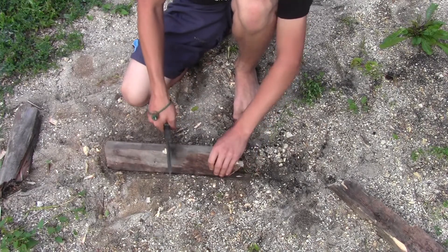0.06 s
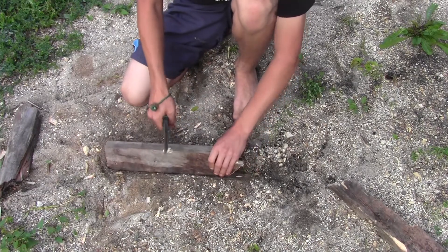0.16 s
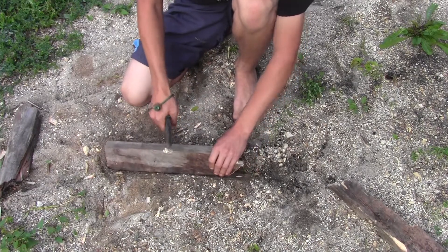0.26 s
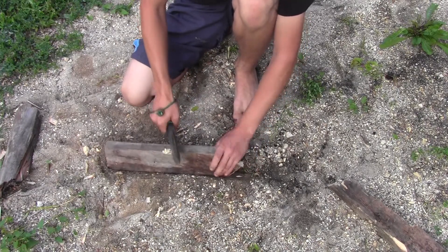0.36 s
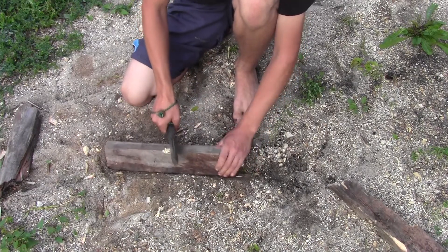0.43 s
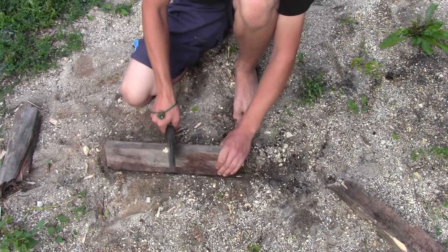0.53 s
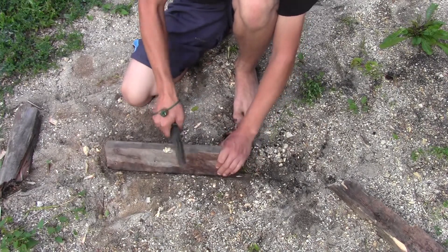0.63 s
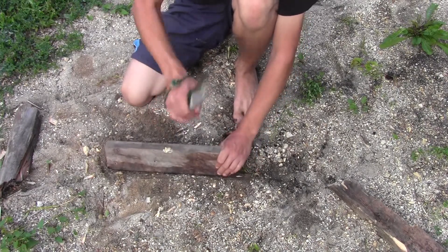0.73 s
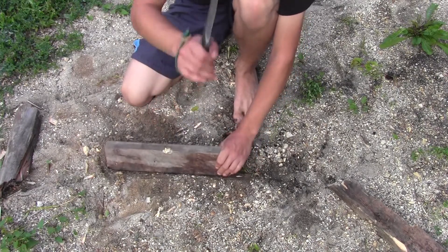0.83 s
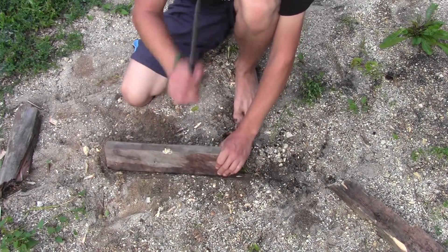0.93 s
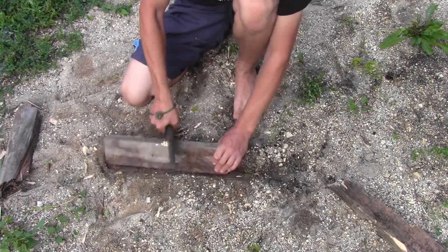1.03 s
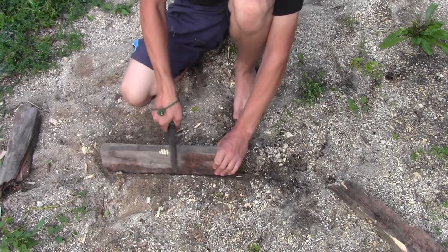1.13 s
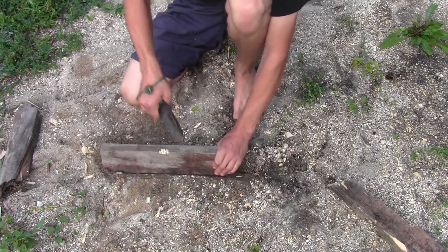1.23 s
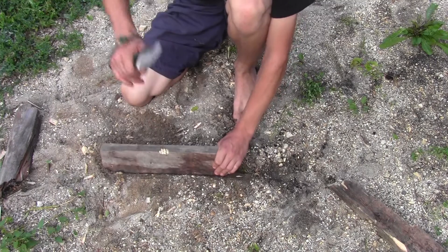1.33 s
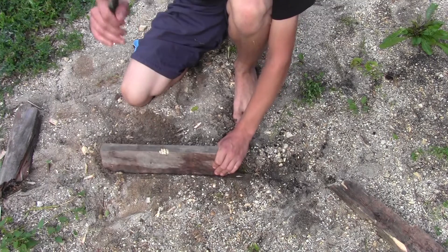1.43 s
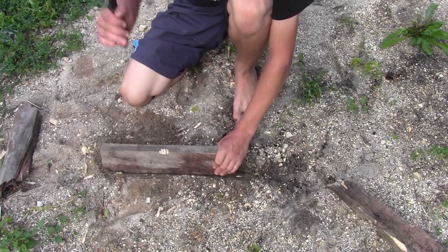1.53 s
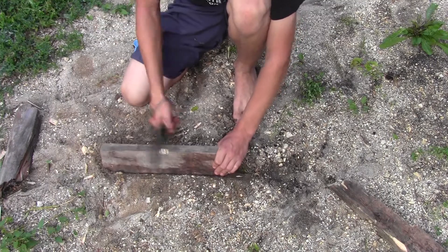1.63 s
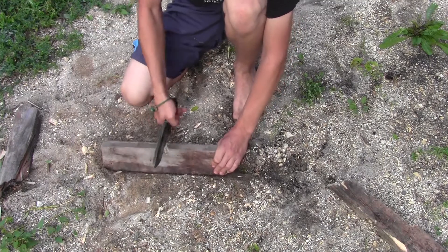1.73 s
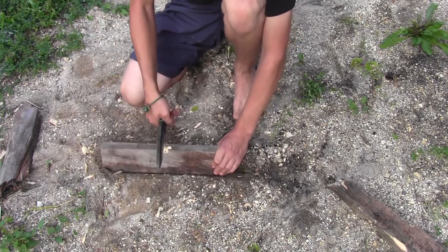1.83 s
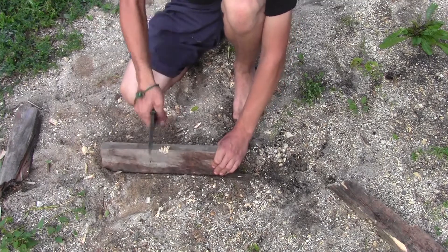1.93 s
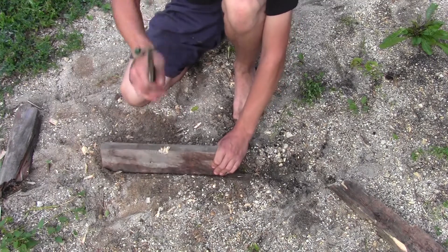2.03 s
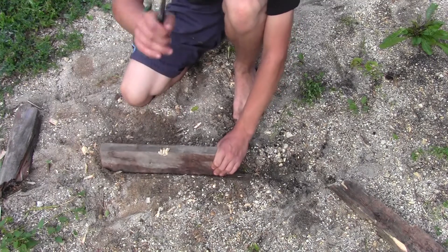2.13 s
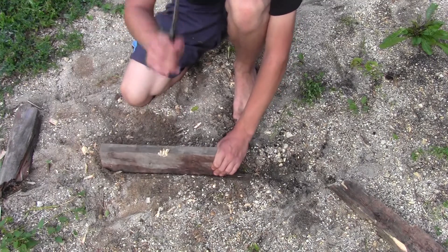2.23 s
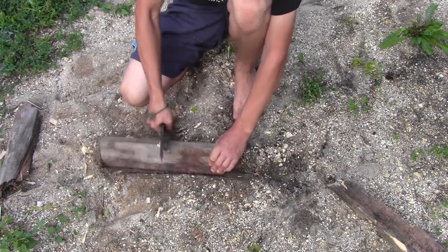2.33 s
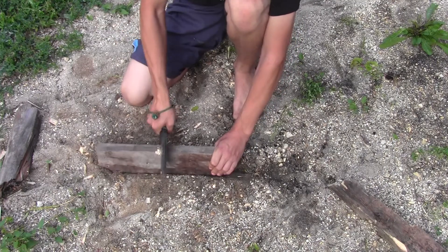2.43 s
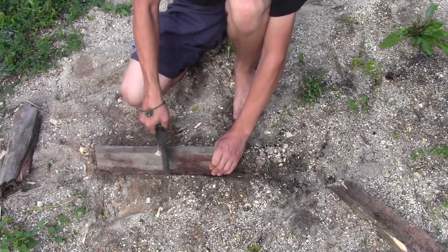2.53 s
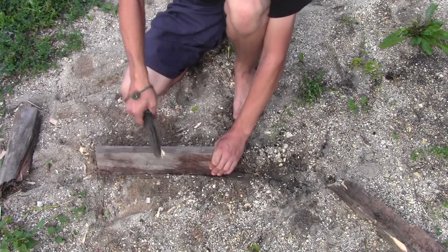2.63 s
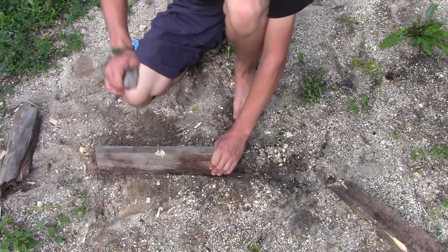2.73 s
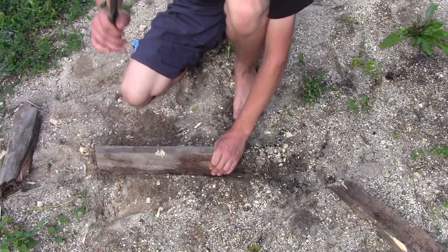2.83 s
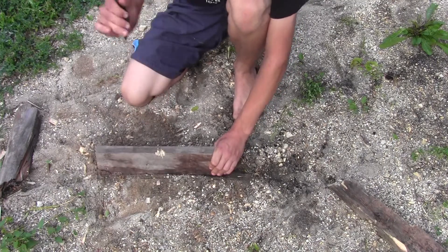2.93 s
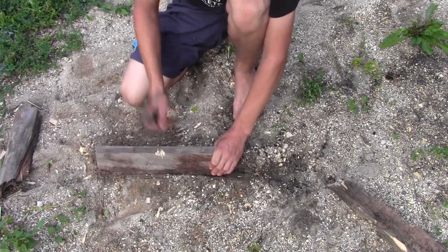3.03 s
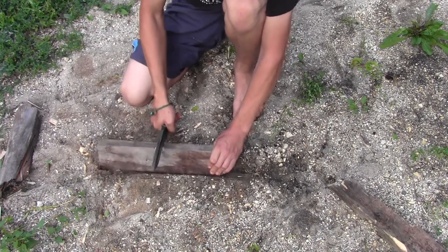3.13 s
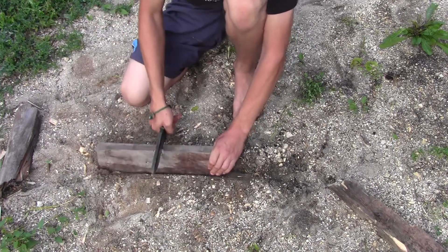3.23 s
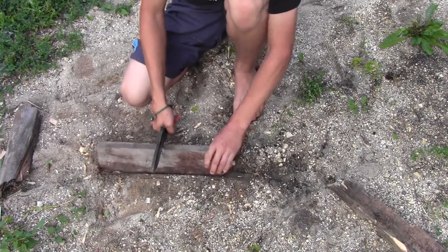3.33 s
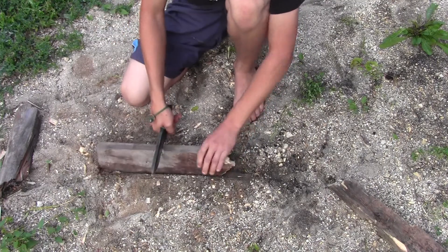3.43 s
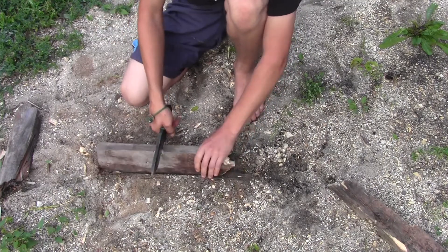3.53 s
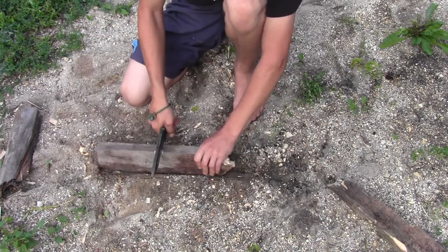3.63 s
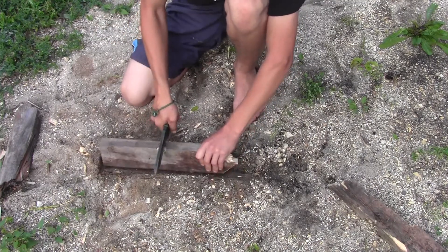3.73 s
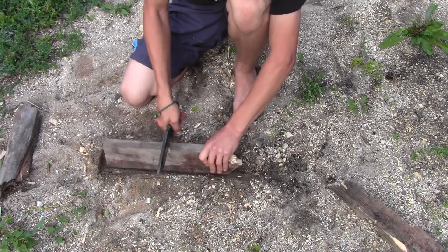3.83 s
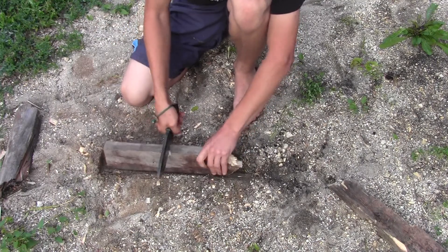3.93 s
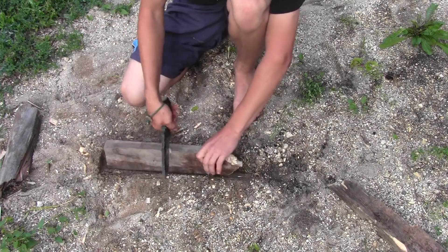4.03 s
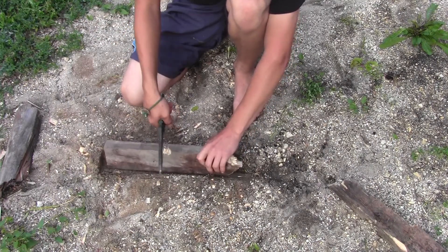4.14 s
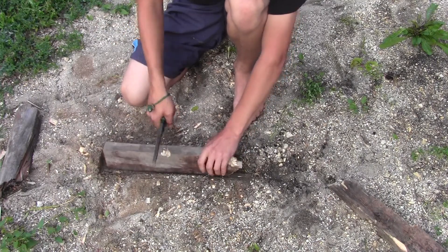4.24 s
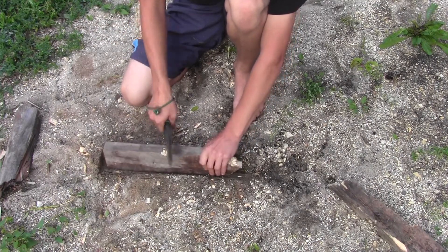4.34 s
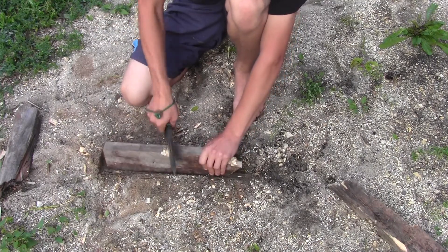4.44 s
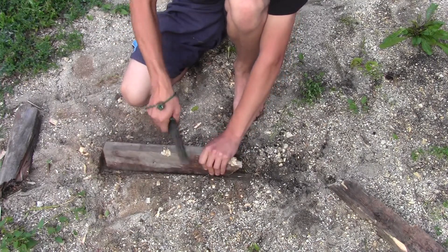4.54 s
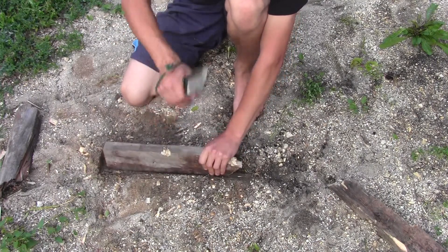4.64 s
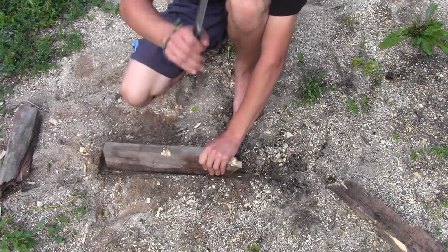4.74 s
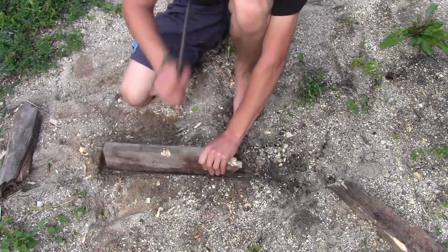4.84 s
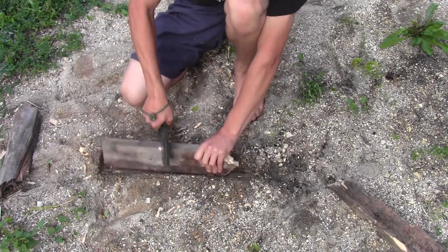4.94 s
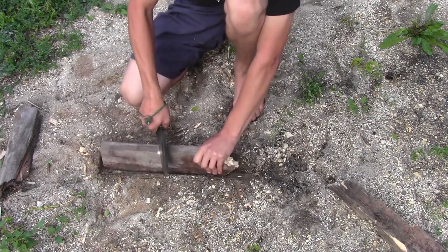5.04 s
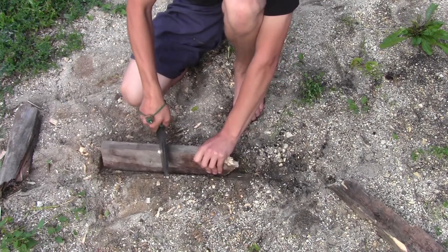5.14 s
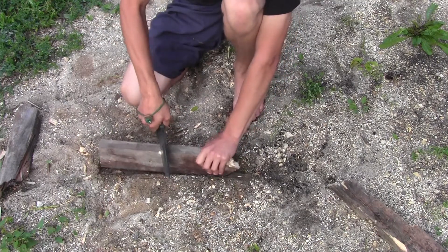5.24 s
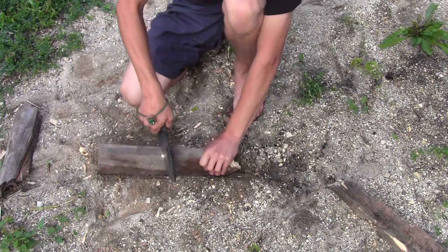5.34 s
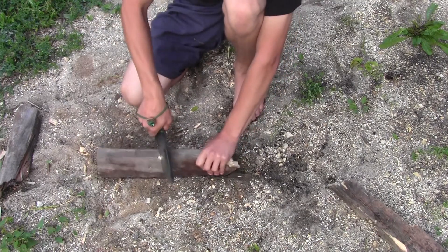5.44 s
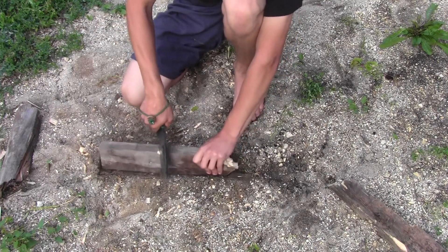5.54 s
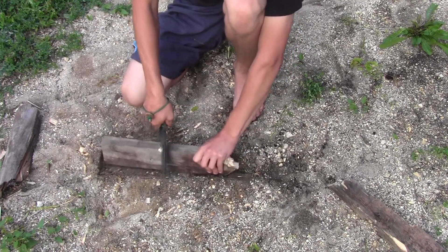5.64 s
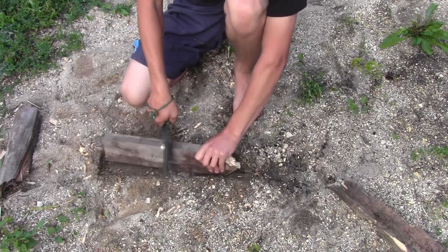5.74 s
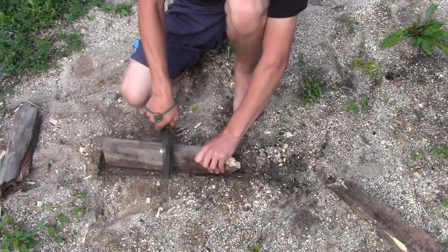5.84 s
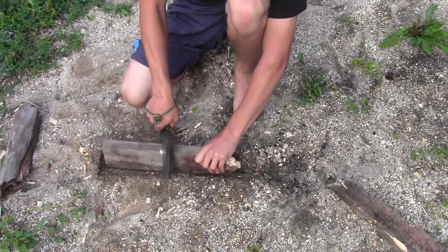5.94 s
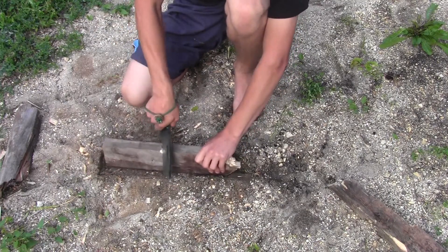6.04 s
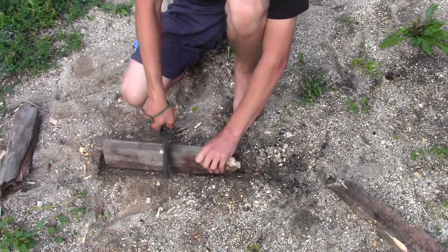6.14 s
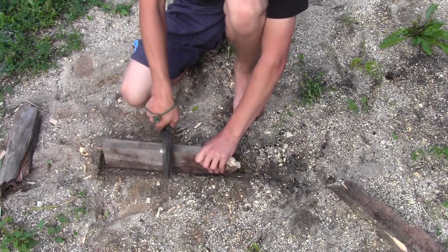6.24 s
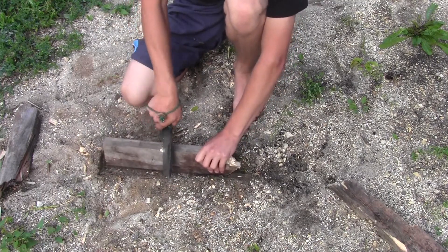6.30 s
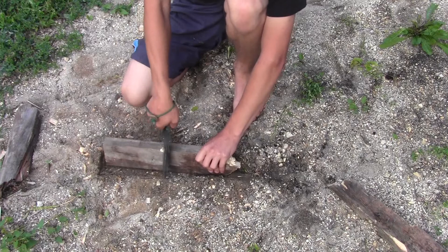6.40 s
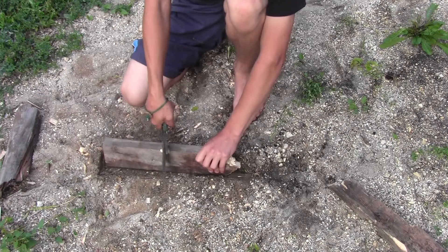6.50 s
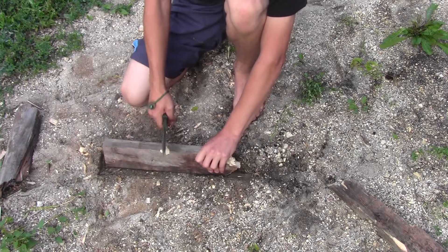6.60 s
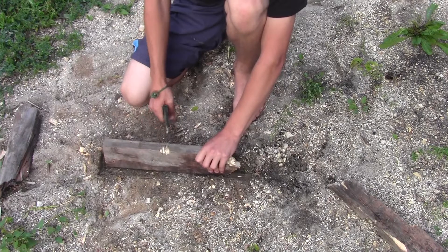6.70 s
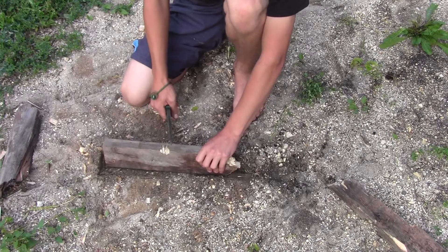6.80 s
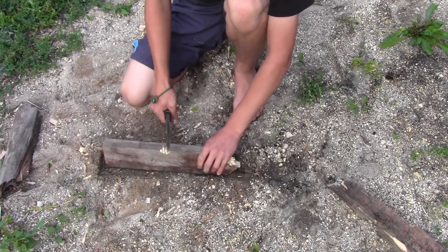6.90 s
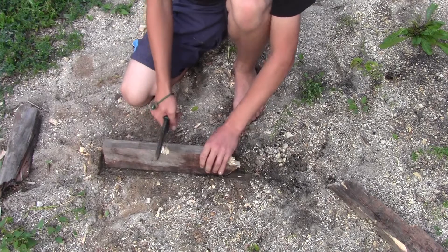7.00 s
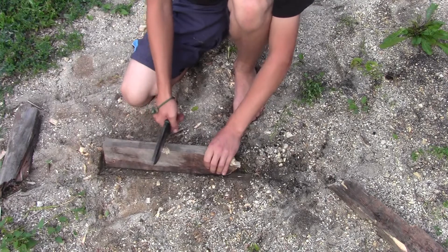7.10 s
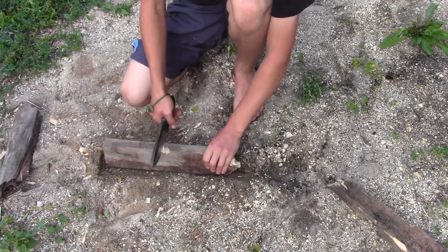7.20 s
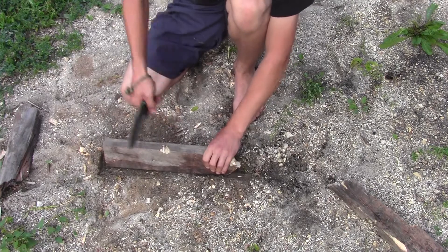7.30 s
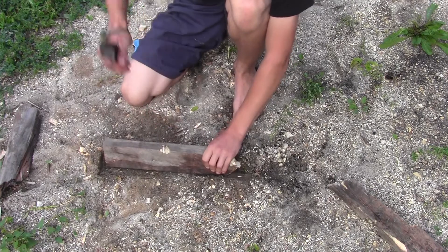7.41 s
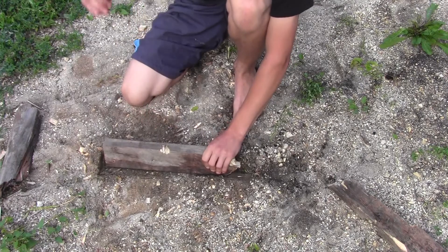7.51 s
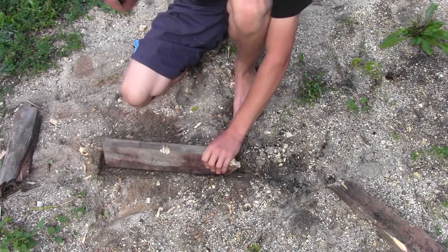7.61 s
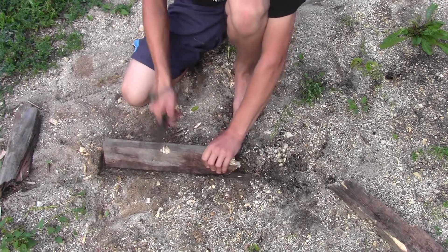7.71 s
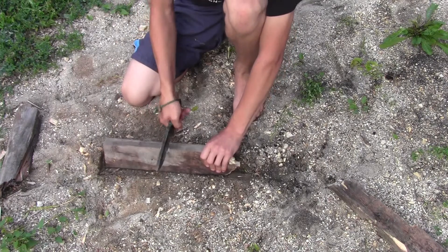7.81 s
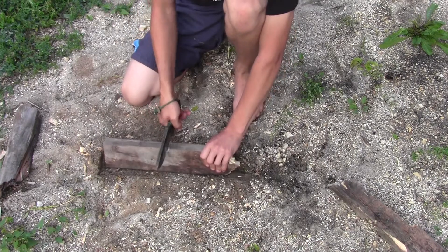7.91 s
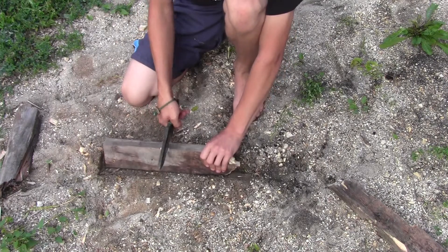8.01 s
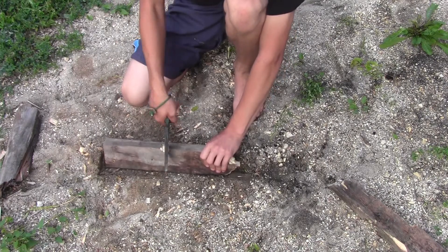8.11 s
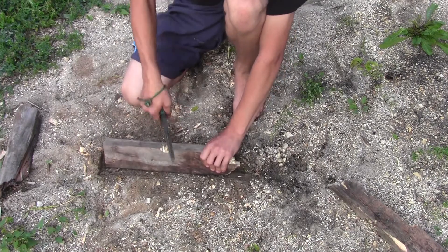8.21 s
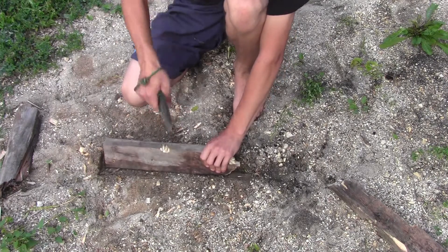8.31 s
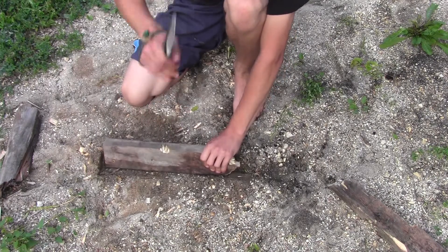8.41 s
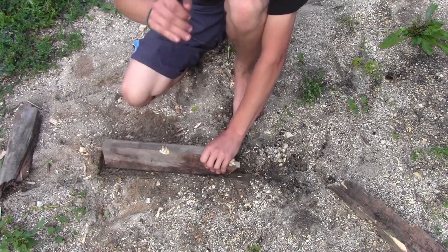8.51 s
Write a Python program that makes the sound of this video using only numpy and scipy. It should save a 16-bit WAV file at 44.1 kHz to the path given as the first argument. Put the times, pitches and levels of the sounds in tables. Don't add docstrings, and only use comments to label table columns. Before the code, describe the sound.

A quiet outdoor yard with a low, wavering engine hum, far traffic and small ticks of grit. Around 0.65 seconds a near bird gives a brief, bright whistle. A heavy knife then chops a short log on sand: hard blows at about 1.1, 1.7, 2.4 and 3.1, each a sharp fibrous crack with a dull short thud, a brief woody ring, a tiny rebound chatter and a quick yard echo. The pitch varies, some lower, some brighter. The bird whistles again near 2.8; others chirp far off. From 3.4 to 4.6 there is soft rustling and a faint blade touch. A bright blow lands at 5.0, followed by scraping, clicks and a sharper snap near 5.5, then a short whistle. Light ticks and chirps continue, with a distant car swelling softly around 7.5. A final, less thuddy blow comes at 7.8, with a faint blade scrape after it.

```python
import sys
import numpy as np
from scipy import signal
from scipy.fft import rfft, irfft
from scipy.io import wavfile

SR = 44100
rng = np.random.default_rng(int(sys.argv[2]) if len(sys.argv) > 2 else 0)


def log_audio(samples):
    frames = np.atleast_2d(samples).T
    limited = np.clip(frames, -1, 1)
    pcm = np.round(limited * 32767).astype(np.int16)
    wavfile.write(sys.argv[1], SR, pcm)


def attenuation_scalar(level_db):
    decades = np.asarray(level_db, float) / 20
    return 10 ** decades


N = 377496

# start_s, thud_db, lower_ring_db, upper_ring_db, crack_db
BLOWS = [
    (1.074, -6, -8.5, -18.5, -13),
    (1.7152, -4, -22, -10.5, -15),
    (2.3913, -3, -5, -18.5, -16.5),
    (3.1295, -2, -40, -9, -17),
    (4.9677, -4, -38, -1.5, -16),
    (7.7954, -9, -35, -6.5, -13),
    (4.4543, -35.5, -44, -47, -42),
]
# contact_ms, shove_late_ms, ring_start_ms, late_echo_db
BITES = [(0.68, -0.2, 2.1, -3), (0.6, -.5, .7, -0.5), (0.52, -0.12, 1.2, 9), (.52, -0.6, .7, -5),
         (0.56, -0.43, .6, 3), (0.6, -0.63, 0.61, -3.5), (0.84, -0.34, 0.79, 0)]
# freq_hz, likeness_0_to_1
LIKENESS = [(60, 0.98), (130, 1), (290, 0.53), (700, 0.44), (1400, 0.31), (3100, 0.32), (7000, 0.083),
            (15000, 0.26)]
# time_s, pitch_hz, level_db
CALL = [(0, 2065, -17), (.02, 2700, -1.5), (.04, 2825, -5.5), (.05, 3294, 6), (.066, 3256, 4),
        (.078, 3705, 3.5), (.105, 3650, -3.5), (.118, 3145, 2.5), (.16, 3174, -15)]
ARCHED_CALL = [(0, 2020, -16.5), (.02, 2527, -10.5), (.045, 2817, 0.5), (.055, 3130, 5.5),
               (0.066, 3634, -3), (.1, 3710, -3), (.12, 3450, 1), (.14, 3034, -5), (0.173, 3070, -27)]
SHORT_CALL = [(0, 2900, -9), (.012, 2900, 2.5), (.028, 3000, -5), (.036, 3500, 1), (.05, 3800, -2.5),
              (.07, 3800, 4.5), (.08, 3350, 6), (.1, 3250, -1), (0.137, 3300, -15)]
LEAN_LEFT = attenuation_scalar([[0.75], [-0.75]])
OPPOSITE = np.array([[1], [-1]])


def rms_one(x):
    return x / np.sqrt(np.mean(x ** 2) + 1e-20)


def in_time(rows, size=N):
    s, *columns = np.transpose(rows)
    return [np.interp(np.arange(size) / SR, s, c) for c in columns]


def at_hz(points, hz):
    points_hz, values = np.transpose(points)
    return np.interp(np.log(hz + 1), np.log(points_hz), values)


def band(x, low_hz, high_hz):
    sos = signal.butter(2, [low_hz, min(high_hz, 0.45 * SR)], "band", fs=SR, output="sos")
    return signal.sosfilt(sos, x)


def drift(rate_hz):
    knots = rng.standard_normal(2000)
    return np.interp(np.arange(N) * rate_hz / SR, np.arange(len(knots)), knots)


def ring(force, modes):
    out = 0
    for hz, db, t60_s in modes:
        r, w = attenuation_scalar(-60 / (t60_s * SR)), 2 * np.pi * hz / SR
        out = out + attenuation_scalar(db) * signal.lfilter([0, np.sin(w)], [1, -2 * r * np.cos(w), r * r], force)
    return out


def whistle(hz):
    return 2 * np.pi * np.cumsum(hz) / SR


def coloured(tone, likeness):
    hz = np.arange(N // 2 + 1) * SR / N
    mid, side = rfft(rng.standard_normal((2, N)))
    alike = np.clip(at_hz(likeness, hz), 0, 1)
    pair = np.sqrt(1 + alike) * mid + np.sqrt(1 - alike) * side * OPPOSITE
    return rms_one(irfft(pair * attenuation_scalar(at_hz(tone, hz)), N))


def add(out, sound, start_s):
    at = round(start_s * SR)
    out[..., at:at + sound.shape[-1]] += sound[..., :N - at]


def traffic():
    # freq_hz, level_db_per_hz
    engine_tone = [(20, -19), (53, -5), (87, 1.5), (114, 1), (134, -10.5), (217, -11.5), (373, -20.5),
                   (1500, -58)]
    tyre_tone = [(200, -7.5), (400, -1.5), (775, -0.5), (1940, -14.5), (4030, -18.5), (4870, -21.5),
                 (9320, -28), (16000, -41)]
    car_tone = [(200, -39.0), (450, -7.0), (700, 0.0), (1000, -10.0), (1500, -20.5), (3000, -68.5)]
    nearest_s, pass_s = 7.5, 0.53
    engines = attenuation_scalar(-48 + drift(13.0)) * coloured(engine_tone, LIKENESS)
    tyres = attenuation_scalar(-57 + 0.8 * drift(3)) * coloured(tyre_tone, LIKENESS)
    distance = np.hypot(1, (np.arange(N) / SR - nearest_s) / pass_s)
    car = attenuation_scalar(-54.5 + drift(3.1)) / distance * coloured(car_tone, LIKENESS)
    return engines + tyres + car


def hum():
    # time_s, pitch_hz, level_db
    engine_path = [(0, 112.9, -45), (.55, 107.8, -62), (.8, 107.9, -42), (1.4, 107, -46), (1.9, 105.3, -57),
                   (2.11, 109.7, -52), (2.6, 109.8, -45), (2.87, 113.1, -49), (4.4, 114.6, -53),
                   (4.8, 108, -46.5), (5.27, 114.2, -58), (5.5, 109.8, -41), (5.93, 108.6, -45.5),
                   (6.3, 104, -64), (6.5, 112.8, -49), (7.7, 107.1, -48.5), (8.15, 112.4, -58),
                   (8.56, 109.1, -49.5)]
    # freq_hz, level_db
    steady_lines = [(142, -57.5), (213, -58.5)]
    hz, level_db = in_time(engine_path)
    note = attenuation_scalar(level_db + 2.5 + 2.1 * drift(9)) * np.sin(whistle(hz + 2.535 * drift(14)))
    for line_hz, db in steady_lines:
        note += attenuation_scalar(db + 3 * drift(4)) * np.sin(whistle(line_hz + 2 * drift(8)))
    return note


def among_trees(x, direct, decay_s, squareness):
    t = np.arange(SR // 2) / SR
    mid, side = rng.standard_normal((2, len(t)))
    clumps = attenuation_scalar(3.8 * drift(160)[:len(t)])
    smear = (mid + 0.34 * side * OPPOSITE) * np.exp(-(t / decay_s) ** squareness) * clumps
    echoes = signal.fftconvolve(x[None], rms_one(smear) / np.sqrt(len(t)), axes=1)
    return direct * x + echoes[:, :N]


def birds():
    # start_s, level_db, pitch_factor, second_voice_db, shape
    near_calls = [
        (0.655, -40.5, 1.005, -0.5, CALL),
        (2.847, -42, 1.027, -1.5, ARCHED_CALL),
        (5.634, -44, 1.001, -30, SHORT_CALL),
    ]
    # start_s, length_s, from_hz, to_hz, level_db
    short_glides = [(0.627, 0.056, 3800, 4400, -63), (0.897, 0.055, 3920, 2640, -51),
                    (1.932, 0.077, 4095, 2700, -50), (2.057, 0.1, 4280, 2966, -52),
                    (2.22, 0.058, 4520, 2700, -56), (3.498, 0.087, 4400, 2774, -53),
                    (3.695, 0.058, 4030, 2850, -56.5), (3.798, 0.16, 3890, 3100, -54),
                    (4.327, 0.038, 3860, 2900, -57), (4.484, 0.093, 4000, 2845, -54.5),
                    (4.622, 0.094, 3910, 2590, -55.5), (5.554, 0.14, 3340, 2830, -51),
                    (6.166, 0.086, 3280, 3390, -69.5), (6.28, 0.083, 4350, 2670, -58),
                    (6.447, 0.038, 4292, 2650, -53.5), (6.559, 0.12, 4220, 2820, -50.5),
                    (7.748, .047, 2820, 3730, -50),
                    (6.195, .03, 3500, 5200, -69), (6.665, .04, 3900, 4700, -67),
                     (6.855, .04, 3900, 4700, -69), (6.93, .072, 2610, 3900, -69),
                     (7.04, .075, 3500, 4600, -69), (7.252, .07, 3600, 4700, -68),
                     (7.36, .05, 2710, 3324, -70), (7.472, .068, 3600, 4600, -69)]
    # freq_hz, level_db_per_hz
    chorus_tone = [(2200, -20), (2900, -0.5), (3600, -1.5), (4500, 0), (5000, -26.5)]
    near, falling, rising = np.zeros((3, N))
    quaver, throb = 1 + 0.011 * drift(200), attenuation_scalar(3.5 * drift(150))
    for k, (start_s, db, factor, overtone_db, shape) in enumerate(near_calls):
        hz, shape_db = in_time(shape, size=round(shape[-1][0] * SR))
        size = len(hz)
        phase = whistle(factor * hz * quaver[k * size:(k + 1) * size])
        age = np.arange(size) / SR / 0.019
        overtone = attenuation_scalar(overtone_db) * age * np.exp(-age ** 2) * np.sin(1.75 * phase + 2 * np.sin(phase / 9))
        add(near, attenuation_scalar(db) * (attenuation_scalar(shape_db) * np.sin(phase) + overtone), start_s)
    for start_s, length_s, from_hz, to_hz, db in short_glides:
        size = round(length_s * SR)
        glide_hz = np.linspace(from_hz, to_hz, size) * quaver[round(start_s * SR):][:size] ** 1.8
        chirp = attenuation_scalar(db) * np.hanning(size) ** 0.13 * np.sin(whistle(glide_hz))
        add(rising if to_hz > from_hz else falling, chirp, start_s)
    chorus = attenuation_scalar(-73.5 + 3.5 * drift(13.0)) * coloured(chorus_tone, LIKENESS)
    falling = among_trees(falling * np.sqrt(throb), direct=0.35, decay_s=0.1, squareness=1)
    rising = among_trees(rising * np.sqrt(throb), direct=1.15, decay_s=0.07, squareness=1)
    near = among_trees(near * throb, direct=0.38, decay_s=0.07, squareness=1.35)
    return near * LEAN_LEFT + falling + rising + chorus


def stirring():
    # middle_s, length_s, level_db, dull_part_db
    shifts = [(0.109, 0.038, -62, -2.5), (0.257, 0.33, -74.5, 9.5), (0.541, 0.03, -60, 1),
              (0.604, 0.056, -71, 8), (2.171, 0.089, -67.5, -3), (2.624, 0.25, -67.5, 8.5),
              (3.389, 0.27, -68.5, 1.5), (3.605, 0.071, -64.5, 2), (3.738, 0.057, -57, -2),
              (3.916, 0.17, -54.5, 1.5), (4.082, 0.05, -61, 5), (4.262, 0.23, -69.5, 6.5),
              (4.557, 0.086, -74.5, 4), (5.275, 0.11, -61, 5), (5.36, 0.1, -62, 1.5),
              (5.428, 0.015, -60, -6), (5.556, 0.14, -51, 4), (5.662, 0.024, -47.5, 0),
              (5.731, 0.15, -56.5, -1.5), (5.911, 0.08, -59, 5), (6.02, 0.1, -66.5, 0),
              (6.165, 0.036, -62.5, 1), (6.345, 0.21, -67.5, 3), (6.54, 0.071, -73, 7),
              (6.634, 0.057, -56.5, 3), (6.99, 0.052, -64.5, 0), (7.172, 0.041, -59.5, 1),
              (8.172, 0.041, -67, -6), (8.532, 0.11, -67.5, -7)]
    # arm_swing_db, spray_db, spray_hold_s, dull_part_db
    sprays = [(-55.5, -51.5, 0.12, -0.5), (-73, -54.5, .1, 1.5), (-60, -55, 0.11, 1.5),
              (-69, -60, 0.11, -3), (-64, -59, 0.17, 3), (-60.5, -56.5, 0.088, 5)]
    edge_db, squareness = -7, 1.6
    swing_rise_db_per_s, spray_fall_db_per_s = 170, 230
    t = np.arange(0, N + 16, 16) / SR
    power = np.zeros((2, len(t)))
    for middle_s, length_s, db, dull_db in shifts:
        swell_db = db + edge_db * np.abs(2 * (t - middle_s) / length_s) ** squareness
        power += attenuation_scalar(2 * (swell_db + [[0], [dull_db]]))
    for (start_s, *_), (swing_db, spray_db, hold_s, dull_db) in zip(BLOWS, sprays):
        before_db = swing_db - swing_rise_db_per_s * (start_s - t)
        after_db = spray_db - spray_fall_db_per_s * np.maximum(t - start_s - hold_s, 0)
        power += attenuation_scalar(2 * (np.where(t < start_s, before_db, after_db) + [[0], [dull_db]]))
    return in_time(np.column_stack([t, *np.sqrt(power)]))


def rustle():
    # freq_hz, level_db_per_hz
    rustle_tone = [(2940, -30), (5000, 0.5), (5510, -4), (6380, 4.5), (8670, 3), (9600, 4), (12900, -10.5),
                   (16000, -40)]
    dull_tone = [(700, -21.5), (1500, 3.0), (3500, 6.5), (4800, 3.0), (5600, -29.5), (8000, -50.0)]
    bright_gain, dull_gain = stirring()
    hits = (rng.random(N) < 220 / SR) * attenuation_scalar(4 * np.minimum(rng.exponential(1, N), 3))
    grains = 1 + 0.21 * signal.lfilter([1], [1, -0.97], hits)
    bright = coloured([(4000, -12.5), *rustle_tone[1:]], [(5000, 0.96), (15000, 0.94)])
    dull = coloured(dull_tone, [(1000, 0.64), (5000, 1.0)])
    bright = attenuation_scalar(1.5 * drift(60)) * bright_gain * rms_one(grains) * bright
    dull = dull_gain * np.sqrt(grains) * dull
    return attenuation_scalar(1.0 * drift(40) + 1.9 * drift(130)) * (bright + dull)


def ticks():
    # start_s, peak_db, dull_part_db
    snaps = [(0.0996, -44.5, -2), (0.235, -46, 1), (0.2782, -30.5, 1.5), (0.5396, -42, -9),
             (1.3922, -35.5, -4), (1.6845, -46.5, 11), (2.0312, -38, 6), (2.2098, -30, 4),
             (2.2953, -37.5, -3), (2.355, -41, -10), (2.583, -31, -11), (3.3352, -40.5, 5),
             (3.9349, -38, -2), (4.2842, -40, 1), (4.305, -38, -8), (4.4582, -31, 5), (4.7817, -46, -7),
             (5.0668, -33, -2), (5.112, -33, 5), (5.3033, -32.5, -3), (5.3303, -40, -2), (5.3574, -44, -2),
             (5.4094, -48, -2), (5.4214, -42, -2), (5.4265, -36, -2), (5.4324, -40, -2), (5.4784, -38, 0),
             (5.5068, -31, -2), (5.53, -25, 6), (5.5399, -19, 1), (5.545, -28, 3), (5.881, -37.5, -2),
             (5.928, -32, 2), (5.9772, -43, -2), (6.626, -31, -6), (7.153, -42, 1.5)]
    # freq_hz, level_db_per_hz
    snap_tone = [(1500, -19), (3500, 1), (4800, -5), (5500, -17.5), (6400, -5.5), (9600, -1.5),
                 (12500, -14.5), (16000, -38)]
    # start_s, level_db, pitch_hz
    knocks = [(0.277, -32.5, 2660), (1.3929, -56, 1850), (2.034, -36, 258), (2.2091, -37, 250),
              (2.5836, -37, 1500), (3.934, -44, 1006), (5.0687, -30, 414), (5.112, -45, 1100),
              (5.305, -42, 3600), (5.34, -49, 2500), (5.5395, -34.5, 557), (5.5377, -30, 3060),
              (6.625, -39, 2220), (7.1542, -42, 620)]
    out, t = np.zeros((2, N)), np.arange(SR // 10) / SR
    shape = (1 - np.exp(-t / 0.00016)) * (np.exp(-t / 0.0004) + attenuation_scalar(-42) * np.exp(-t / 0.0057))
    shape = np.roll(shape, SR // 1000)
    bins_hz = np.arange(len(t) // 2 + 1) * 10.0
    for (start_s, db, dull_db), noise in zip(snaps, rng.standard_normal((len(snaps), len(t)))):
        tone_db = at_hz(snap_tone, bins_hz) + at_hz([(5000, dull_db), (6000, 0)], bins_hz)
        snap = irfft(rfft(noise * shape) * attenuation_scalar(tone_db), len(t))
        pan_db = 2 * noise[-1]
        add(out, snap / np.abs(snap).max() * attenuation_scalar(db + pan_db * OPPOSITE), start_s - 0.001)
    impulse = 1.0 * (t == 0)
    for start_s, db, hz in knocks:
        add(out, attenuation_scalar(db) * ring(impulse, [(hz, 0, 4.7 / hz + 0.016), (1.45 * hz, -4, 0.009)]), start_s)
    return out


def pulls():
    # middle_s, length_s, freq_hz, level_db, width_hz
    singing = [(1.1, 0.1, 3200, -54, 290), (2.69, 0.3, 1130, -54, 630), (2.684, .18, 2160, -61, 220),
               (2.7, 0.34, 3200, -60, 110), (5.27, 0.24, 1320, -53, 550), (3.9, .19, 6100, -54, 250),
               (8.12, .15, 1340, -60.5, 350), (8.13, 0.36, 2200, -66, 180), (8.07, .2, 3150, -73, 220),
               (8.08, 0.21, 2400, -78, 210)]
    out, t = np.zeros(N), np.arange(SR) / SR - 0.5
    for (middle_s, length_s, hz, db, width_hz), noise in zip(singing, rng.standard_normal((len(singing), SR))):
        sing = rms_one(band(noise, hz - width_hz / 2, hz + width_hz / 2))
        add(out, attenuation_scalar(db) * sing * np.exp(-(2 * t / length_s) ** 2), middle_s - 0.5)
    return out * attenuation_scalar(3.5 * drift(40))


def yard(x):
    # low_hz, high_hz, echo_db, fade_db_per_s
    walls = [(117, 350, -40.5, 161), (306, 774, -44, 188), (800, 1450, -40, 134), (1300, 2750, -45, 148),
             (2530, 5870, -42.5, 139)]
    walls_carry_s = (.01, .008, .005, .003, .0013)
    blow_carries_db = [(0, -1, 0.22, -1, 0), (1, -0.33, 1, -0.58, -0.91), (0.69, 0.84, 0.89, -0.36, 0),
                       (0, 0.31, -0.19, 0.082, -0.25), (0.49, -1, -0.62, 0.12, 0.089),
                       (1.3, -2.5, -0.88, -1.1, 0.24), (0, 0, 0, 0, 0)]
    first_echo_s, rise_s, hold_s = 0.0059, 0.014, 0.072
    clumps_db, clumps_per_s = 1.0, 90
    out, t = np.zeros((2, N)), np.arange(SR * 3 // 5) / SR
    rise = np.clip((t - first_echo_s) / rise_s, 0, 1)
    late = attenuation_scalar(-62.5) * np.exp(-((t - 0.3) / 0.11) ** 2 / 2)
    scatter = rng.standard_normal((len(BLOWS), 2, len(t)))
    for (start_s, *_), bite, carried_db, (mid, side) in zip(BLOWS, BITES, blow_carries_db, scatter):
        pair = mid + 0.16 * side * OPPOSITE
        at = round(start_s * SR)
        blow = x[None, at:at + SR // 10]

        def reflect(carry_s, echoes):
            onset = blow * np.exp(-(t[:SR // 10] / carry_s) ** 2)
            add(out, signal.fftconvolve(onset, echoes, axes=1), start_s)

        reflect(0.002, attenuation_scalar(bite[-1]) * late * band(pair, 1080, 3400))
        for (low_hz, high_hz, db, fade), carry_s, more_db in zip(walls, walls_carry_s, carried_db):
            uneven_db = clumps_db * np.interp(t * clumps_per_s, np.arange(50), rng.standard_normal(50))
            echo_db = db + more_db + uneven_db - fade * np.maximum(t - hold_s, 0)
            reflect(carry_s, rise * attenuation_scalar(echo_db) * band(pair, low_hz, high_hz))
    return out * LEAN_LEFT


def chops():
    # freq_hz, level_db, t60_s
    thud_modes = [(177, 0.5, 0.024), (341.5, -12.5, 0.034), (413, 0.5, 0.011), (582, 2.5, 0.01)]
    lower_modes = [(790, -11.5, 0.021), (970, 2.5, 0.016), (1462.7, -7, 0.021)]
    upper_modes = [(1052, -2.5, 0.02), (1165, -7, 0.026), (1303, -16, 0.08)]
    # freq_hz, t60_s
    blade_modes = [(1750, 0.0064), (2380, 0.024), (3000, 0.0077), (4100, 0.011), (4800, 0.014)]
    blade_levels_db = [(-32, -36, -29.5, -21.5, -38), (-28, -15, -50, -12.5, -21),
                       (-5.5, -27, -37, -47.5, -38), (-12, -25.5, -15, -40, -37), (-52, -11, -25, -21, -37),
                       (-44, -19.5, -29, -10, -7), (-53, -52, -49, -45, -62)]
    # middle_ms, spread_ms, gap_ms, level_db, blade_part_db
    chatter = [(9.3, 1, 1.04, -2.5, -6), (9.3, 2.8, 0.97, -14, -6), (10, 0.76, 1.075, -1.5, -8),
               (9.2, 2.7, 0.915, -12.5, -9.5), (9.4, 1.6, .96, -9, -11), (8.5, 1.7, 1.06, -6.5, -10.5),
               (9.3, 2.1, 1.2, -5, -14)]
    # freq_hz, level_db_per_hz
    crack_tone = [(3000, 1.5), (5500, -7), (6500, -0.5), (8200, 3.5), (10500, -1), (13000, -16.5),
                  (16000, -35.5)]
    settle_db, settle_s = -12.5, 0.00753
    crack_s, rebound_s = 0.0011, 0.0097
    twin_ratio, twin_db = 0.92, -13
    out, t = np.zeros(N), np.arange(SR // 5) / SR
    crack_noise = coloured(crack_tone, [(100, 0.69), (200, 0.95)])[0]
    tearing = (t / crack_s) ** 2 * np.exp(2 - 2 * t / crack_s) + 0.11 * np.exp(-t / 0.012)
    tearing += 0.11 * np.exp(-((t - rebound_s) / 0.00119) ** 2)

    def tap(at_s, width_s):
        return np.exp(-((t - at_s) / width_s) ** 2 / 2) / (width_s * SR * np.sqrt(2 * np.pi))

    for k, (start_s, thud_db, lower_db, upper_db, crack_db) in enumerate(BLOWS):
        contact_ms, late_ms, ring_ms, _ = BITES[k]
        middle_ms, spread_ms, gap_ms, back_db, blade_back_db = chatter[k]
        u = (1000 * t - late_ms) / contact_ms - 3.1
        shove = (u ** 2 - 1 + 0.22 * (u ** 3 - 3 * u)) * np.exp(-u ** 2 / 2)
        sound = attenuation_scalar(thud_db) * (0.2 * shove + 0.029 * ring(shove, thud_modes))
        sound += attenuation_scalar(settle_db) * np.roll(sound, round(settle_s * SR))
        touches = [np.exp(-(j * gap_ms / spread_ms) ** 2) * tap((middle_ms + j * gap_ms) / 1000, 0.00005)
                   for j in range(-3, 4)]
        log_force = tap(ring_ms / 1000, 0.00012) + attenuation_scalar(back_db) * sum(touches)
        sound += attenuation_scalar(lower_db) * ring(log_force, lower_modes)
        sound += attenuation_scalar(upper_db) * band(ring(log_force, upper_modes), 820, 1294)
        blade_force = tap(ring_ms / 1000 + 0.000611, 0.00003) + attenuation_scalar(blade_back_db) * touches[3]
        for (hz, t60_s), db in zip(blade_modes, blade_levels_db[k]):
            sound += ring(blade_force, [(hz, db, t60_s), (twin_ratio * hz, db + twin_db, t60_s)])
        sound += attenuation_scalar(crack_db) * tearing * crack_noise[k * len(t):(k + 1) * len(t)]
        add(out, sound, start_s)
    return out


def scene():
    blows = chops()
    side = 0.16 * band(blows, 260, 2600) - 0.04 * np.gradient(blows) - 0.45 * band(blows, 11000, 19000)
    near = blows + side * OPPOSITE + yard(blows) + pulls() + ticks() + rustle()
    return near + hum() + birds() + traffic()


def roll_off(x):
    return signal.sosfilt(signal.butter(12, 15830, fs=SR, output="sos"), x)


def record(dry):
    x = dry / (1 + np.abs(dry) ** 4) ** 0.25
    bass_cut = signal.butter(2, 95.6, "high", fs=SR, output="sos")
    mix = signal.sosfilt(bass_cut, x)
    return roll_off(mix)


dry = scene()
out = record(dry)
log_audio(out)
```